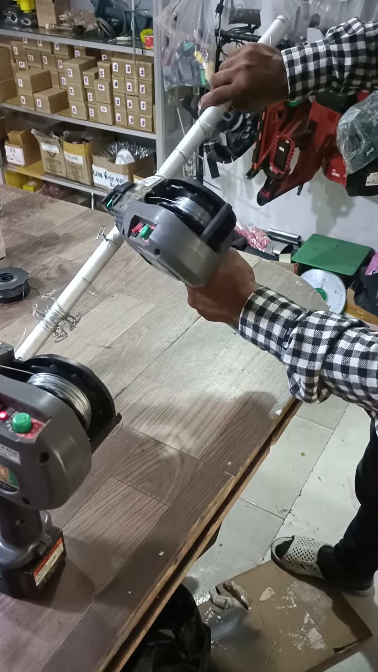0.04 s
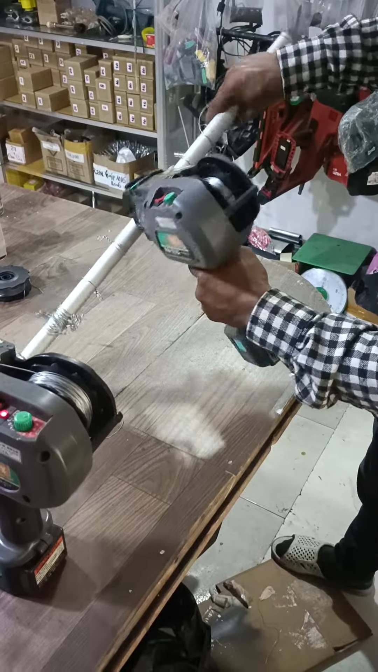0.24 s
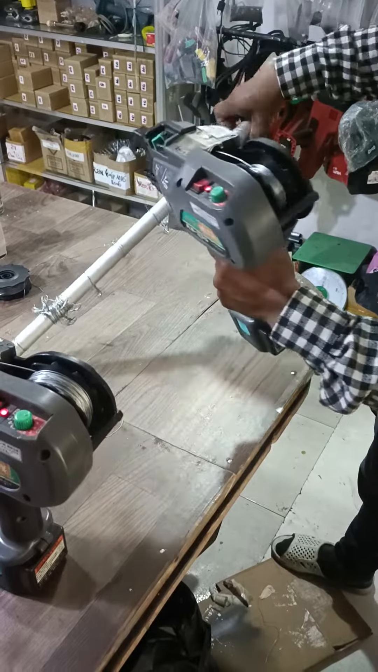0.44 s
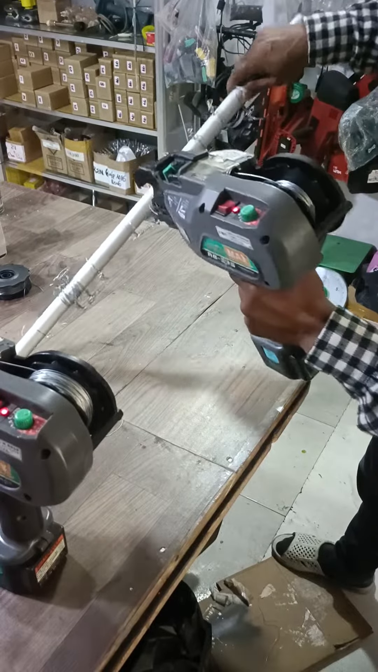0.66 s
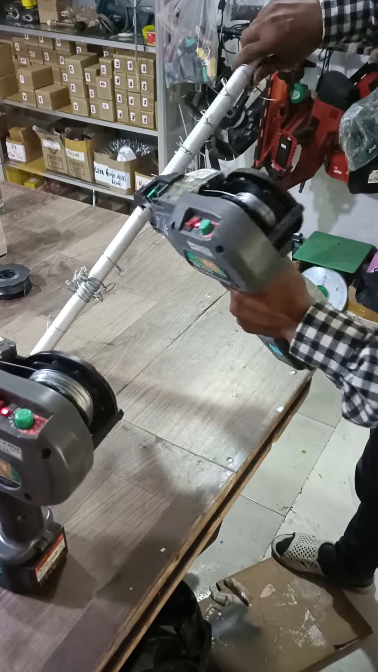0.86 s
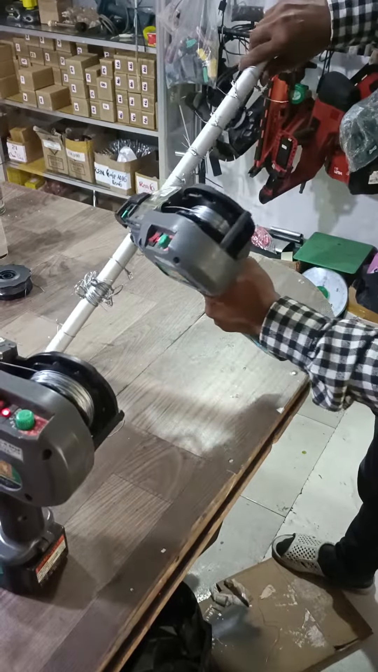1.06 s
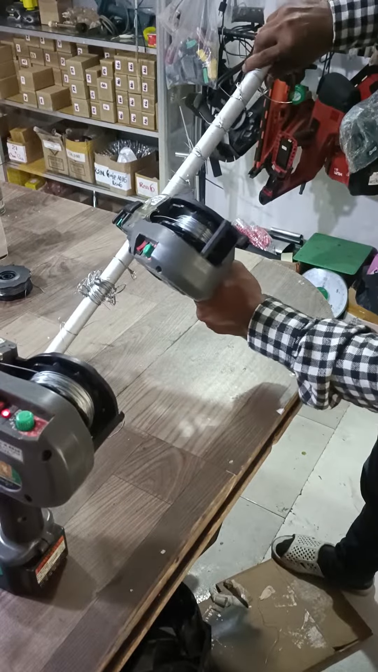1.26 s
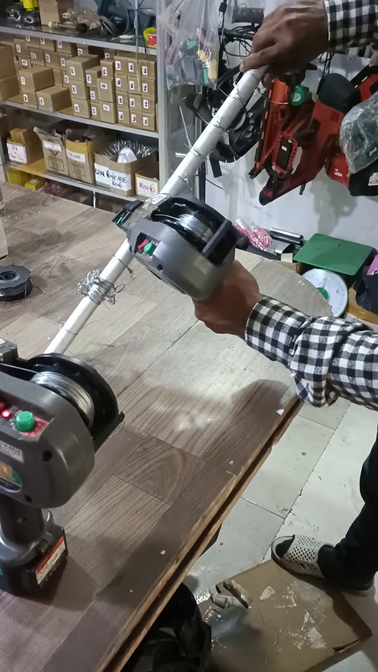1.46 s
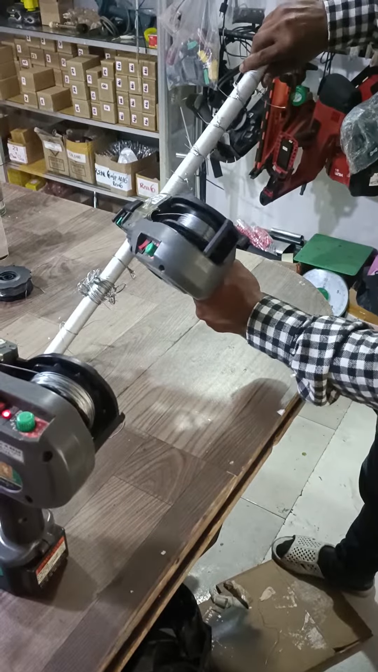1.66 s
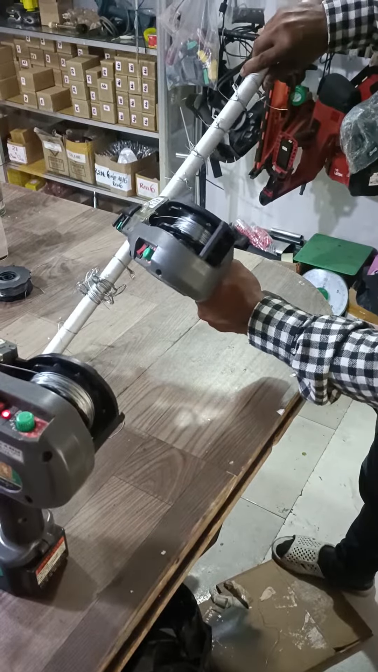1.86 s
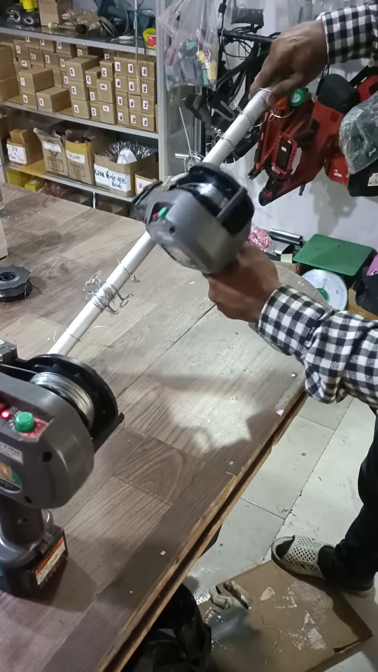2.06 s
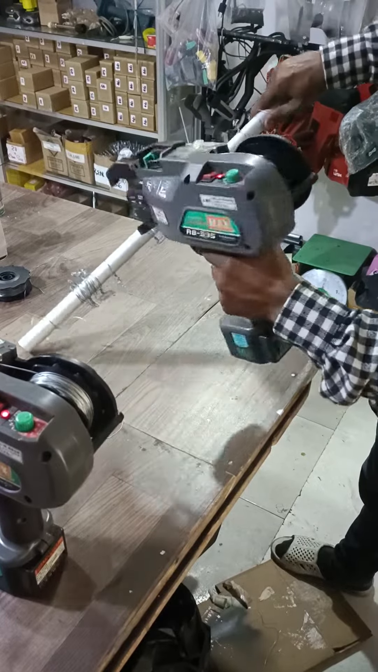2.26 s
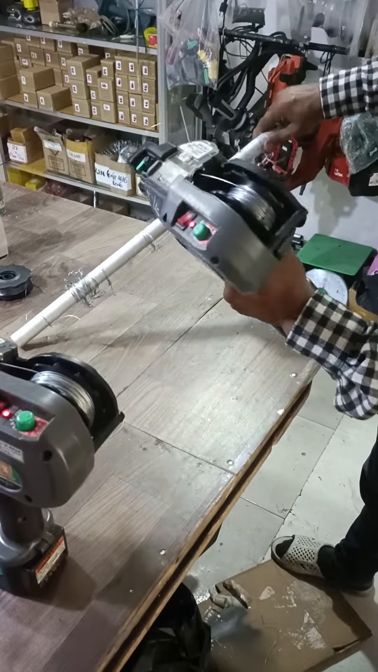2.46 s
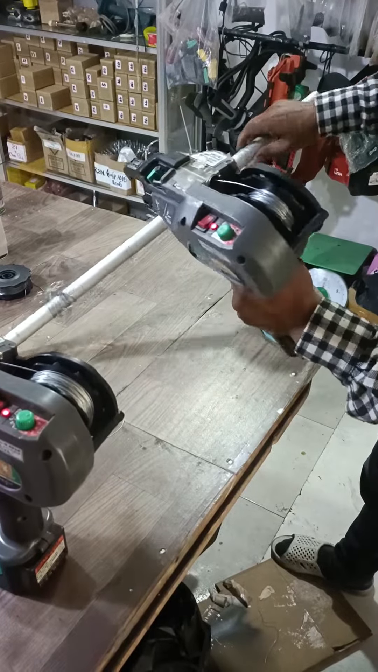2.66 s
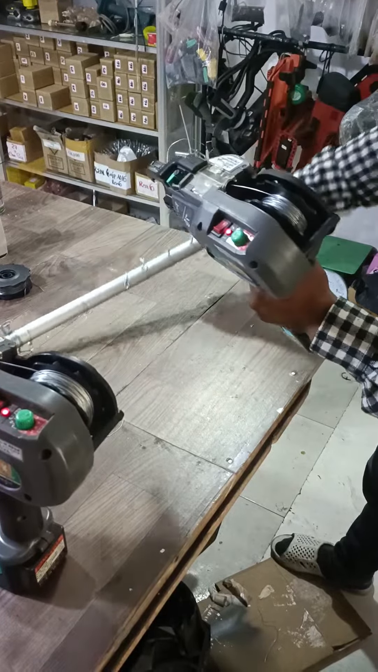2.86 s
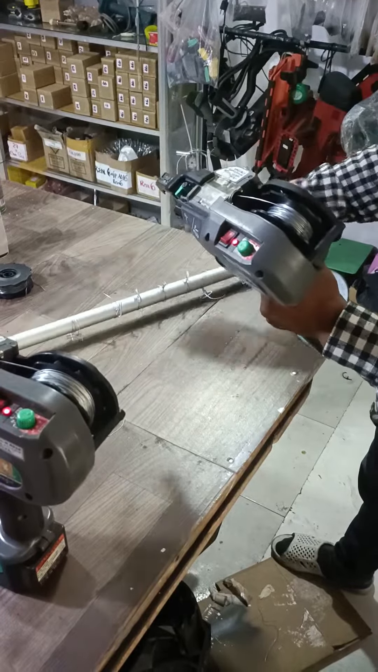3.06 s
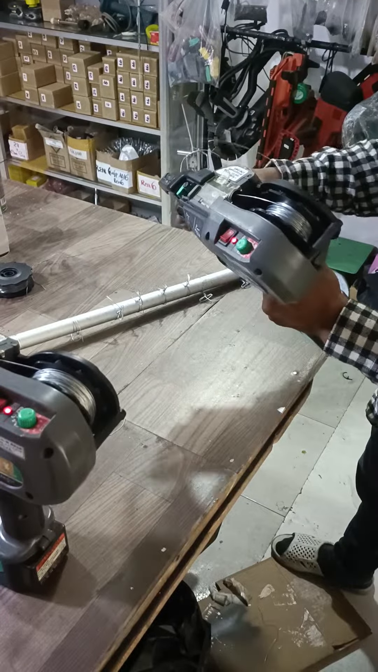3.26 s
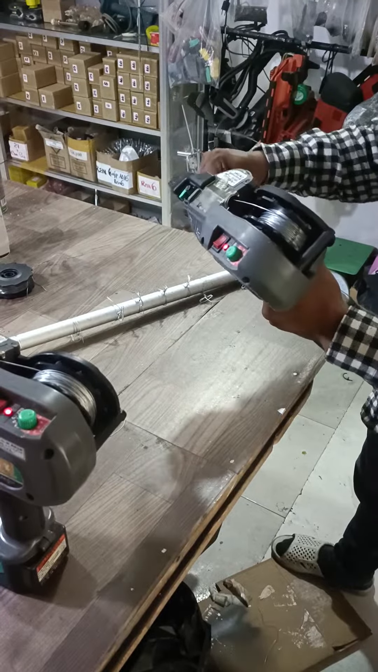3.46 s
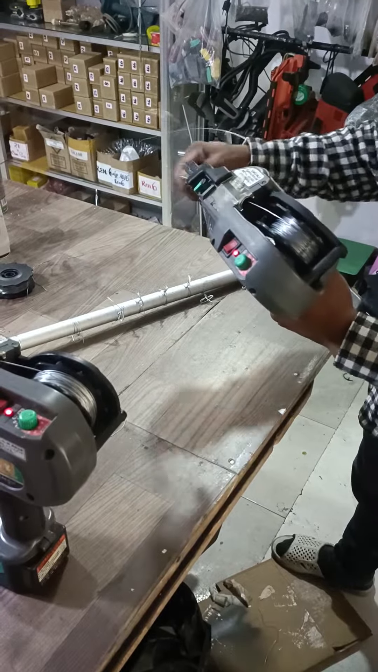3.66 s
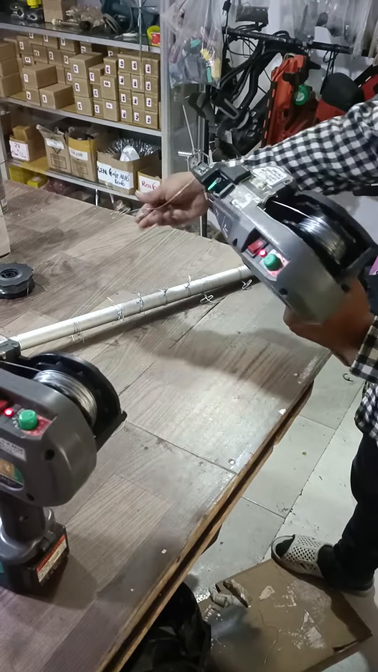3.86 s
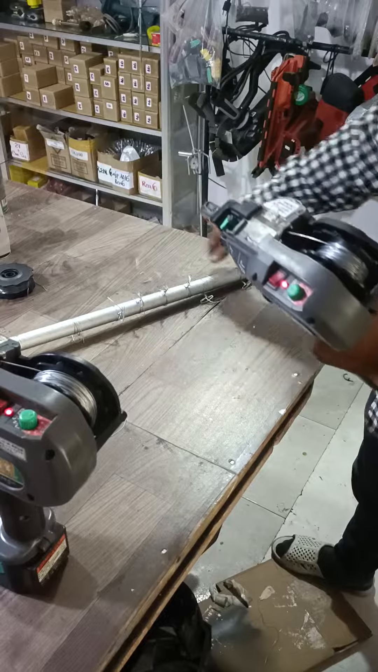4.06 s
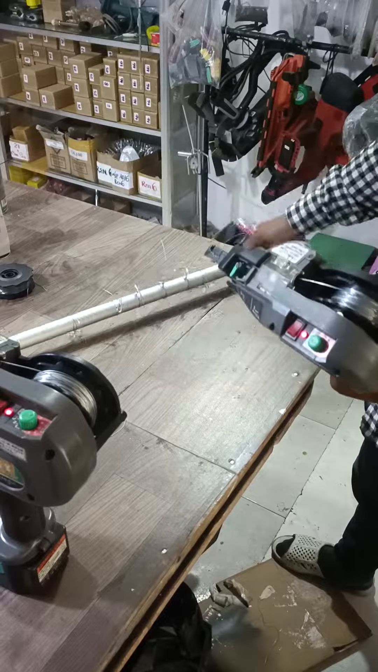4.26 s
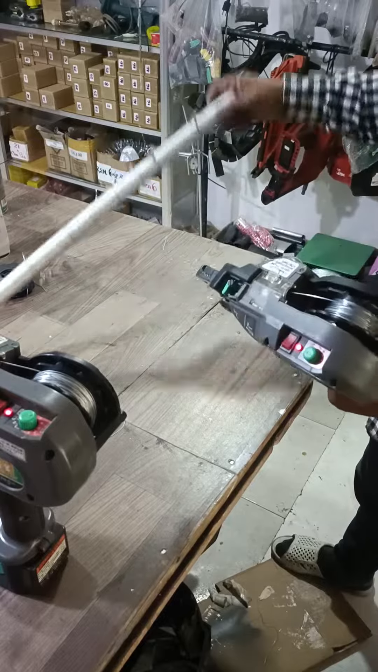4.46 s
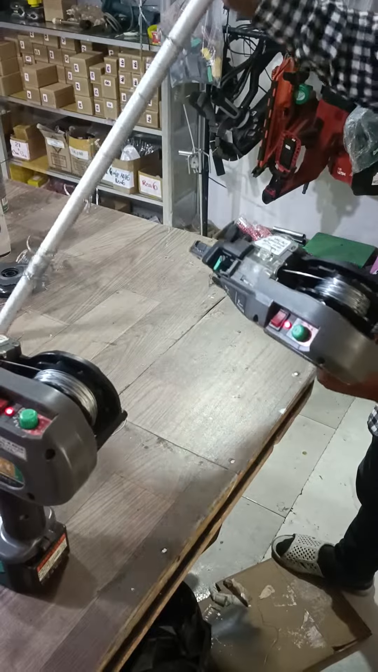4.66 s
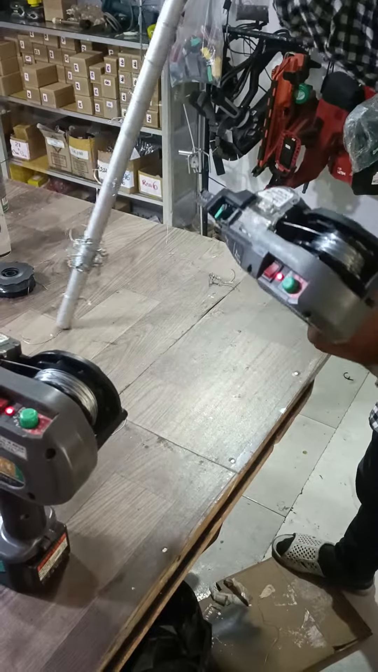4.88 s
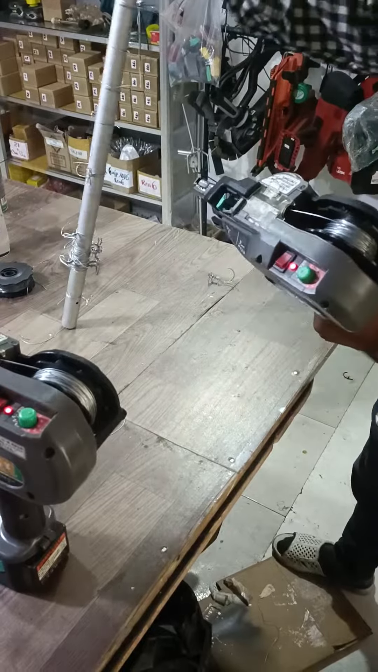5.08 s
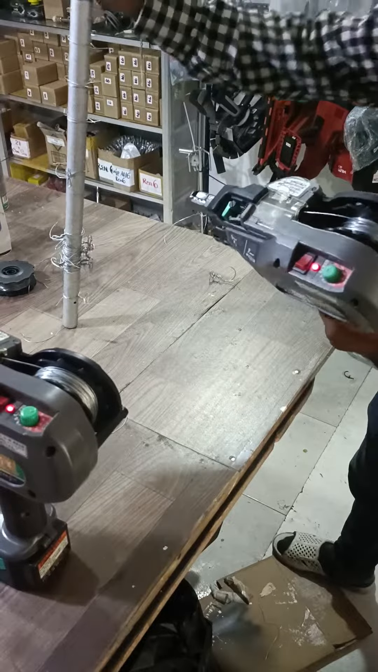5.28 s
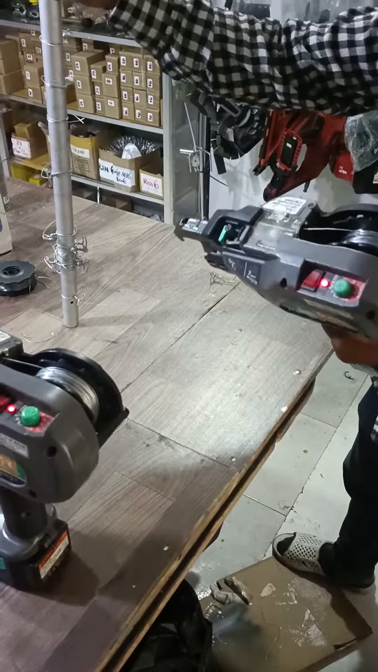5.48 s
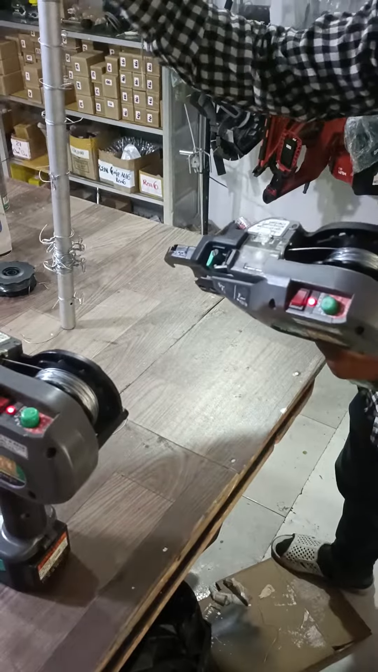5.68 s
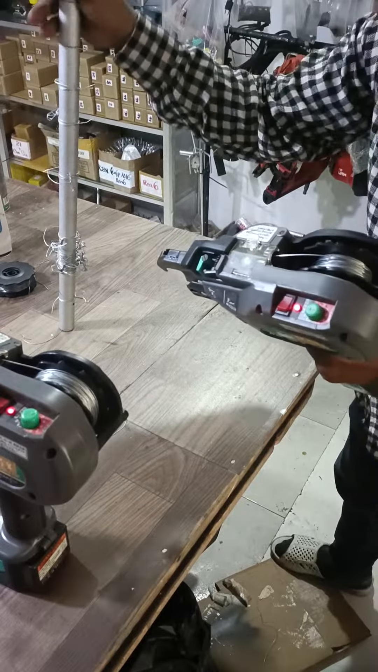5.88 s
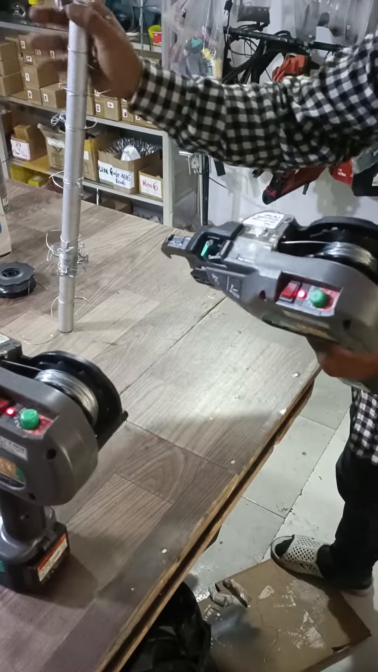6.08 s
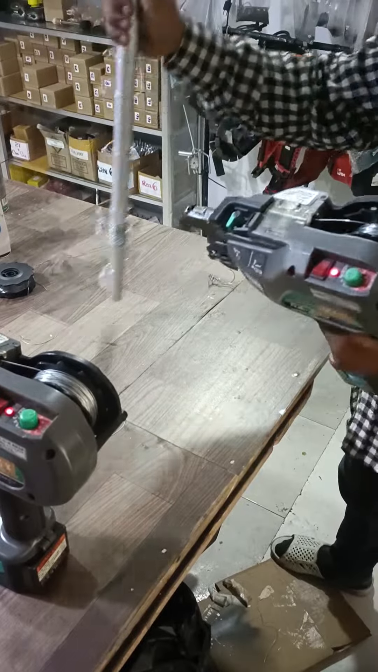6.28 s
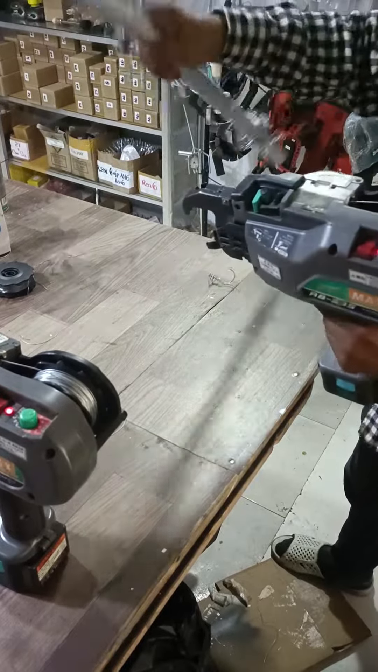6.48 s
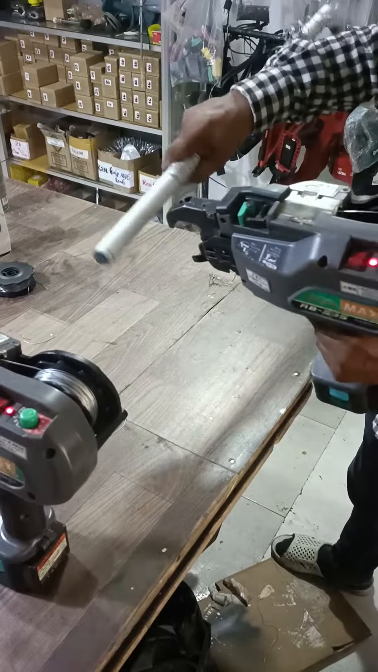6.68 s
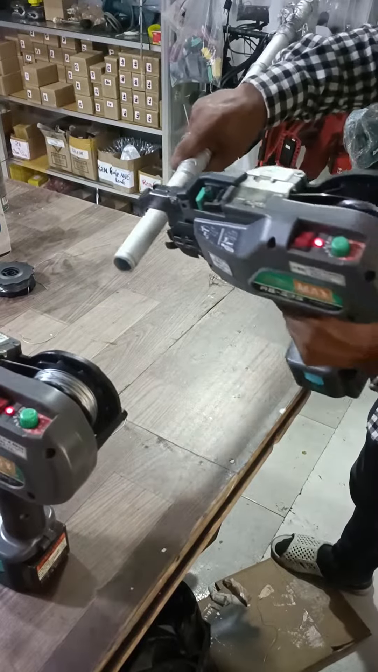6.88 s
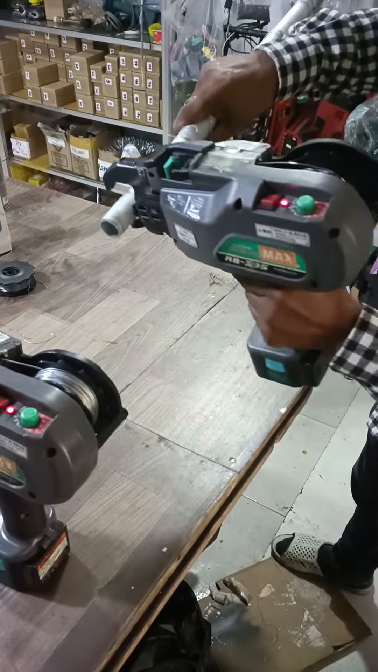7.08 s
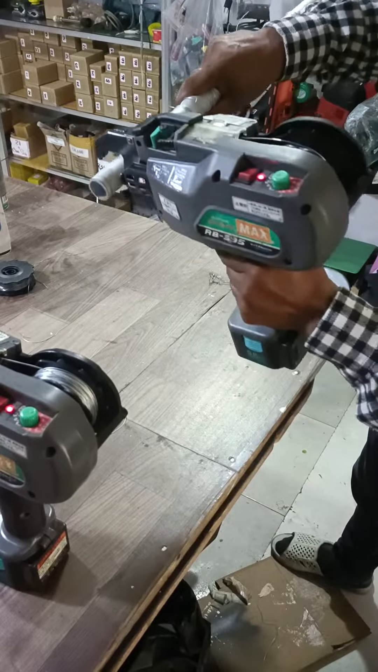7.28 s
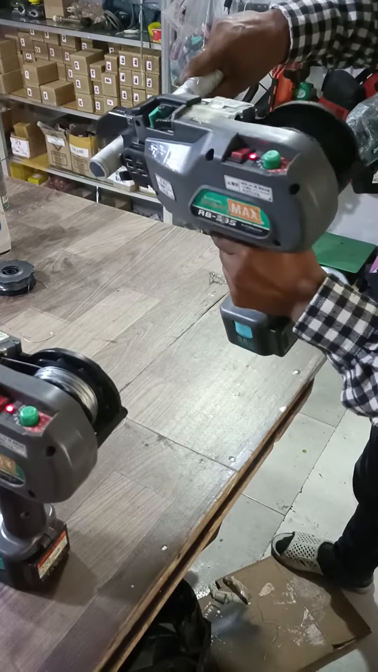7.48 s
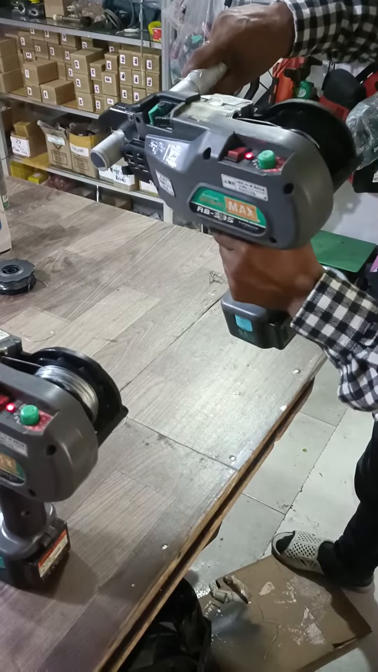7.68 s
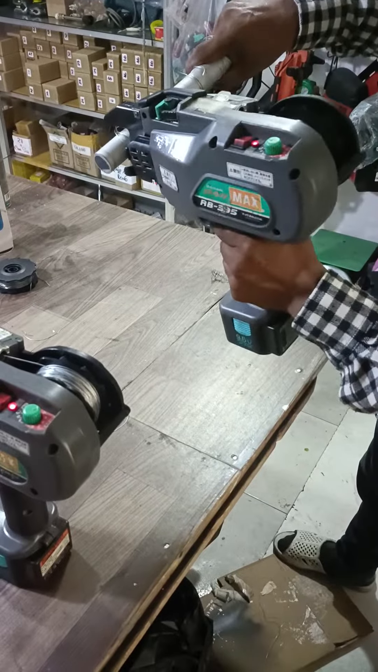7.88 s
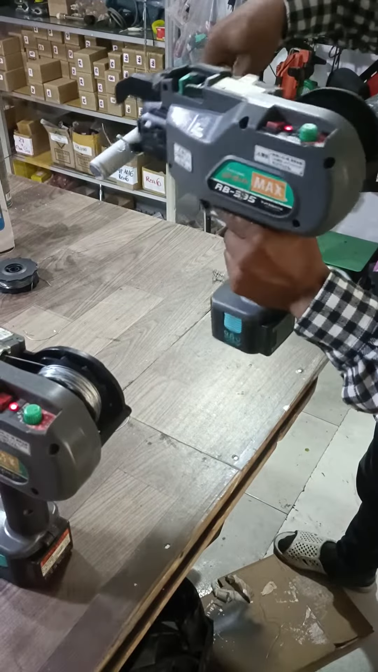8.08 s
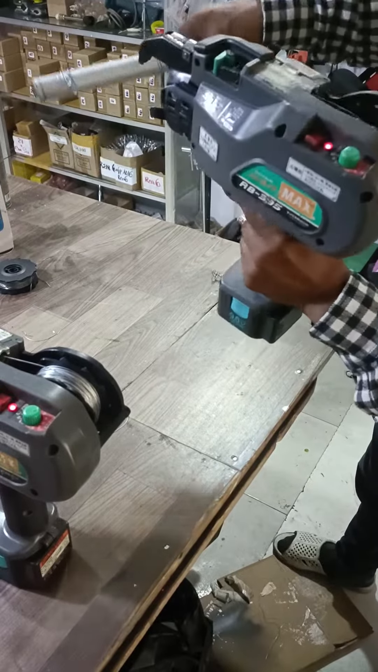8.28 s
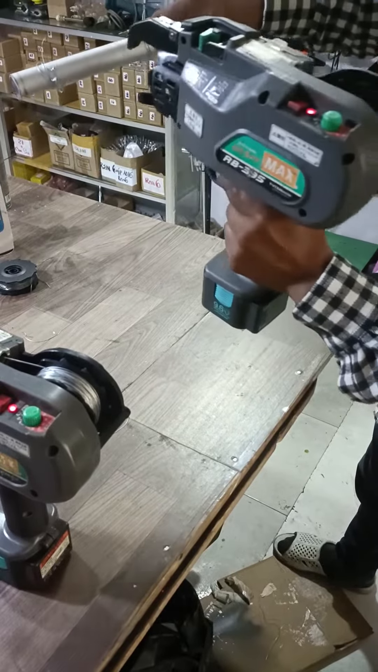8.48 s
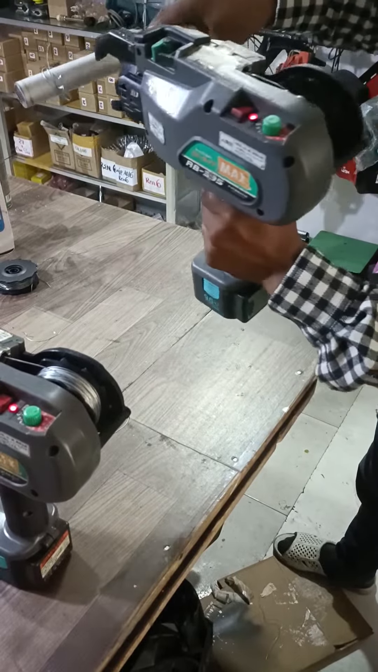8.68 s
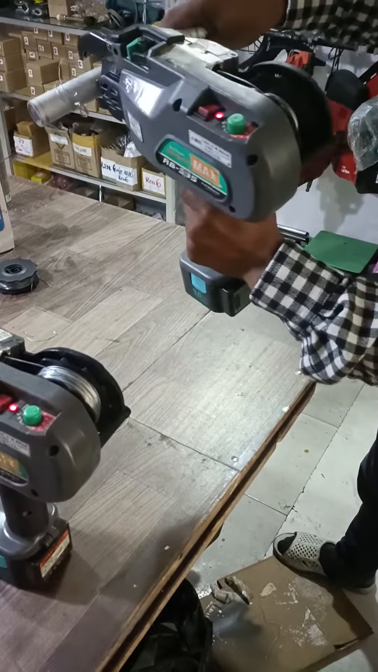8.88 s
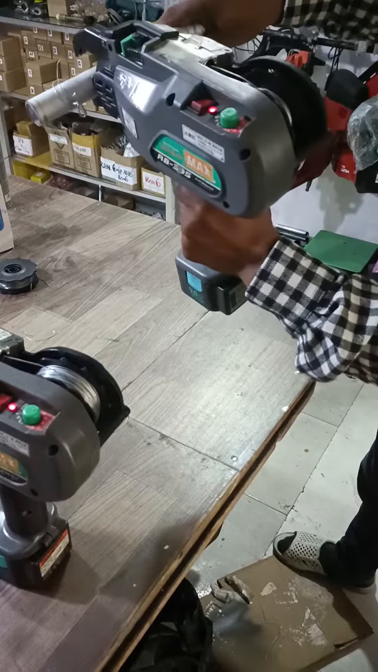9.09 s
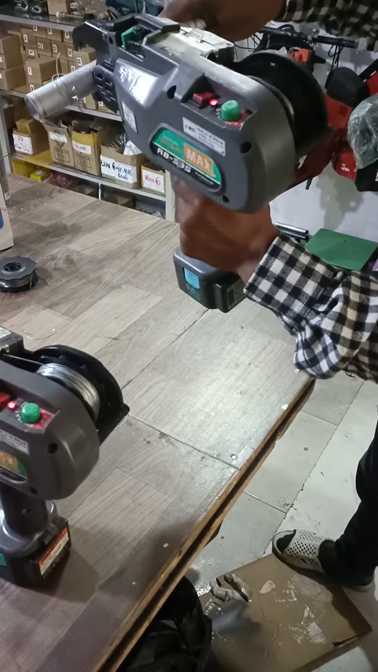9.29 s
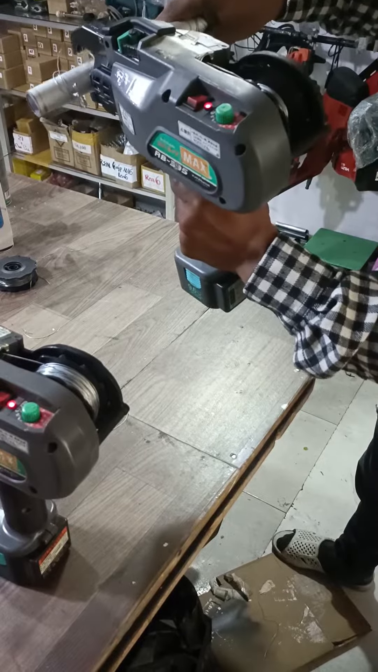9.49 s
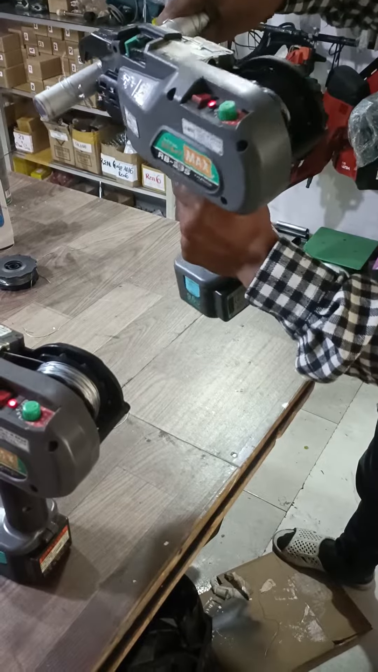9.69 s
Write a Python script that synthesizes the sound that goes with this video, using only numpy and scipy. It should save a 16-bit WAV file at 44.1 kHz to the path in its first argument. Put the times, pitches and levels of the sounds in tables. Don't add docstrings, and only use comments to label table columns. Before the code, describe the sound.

Close up in a small shop, a handheld battery tool ties wire round a hollow pipe. A burst already running ends in ratcheting and clunks, then a second follows. The pipe drops and bounces on a wooden table, scrapes, and loose wire rustles and ticks. After a near-quiet pause come two nose clicks, a third whirring tie, another pause, a firm clack and a last burst. A low fan hums far away; the phone is an arm's length off.

```python
import sys
import numpy as np
from scipy import signal
from scipy.fft import rfft, irfft, next_fast_len
from scipy.io import wavfile
from scipy.ndimage import uniform_filter1d

SR = 44100
rng = np.random.default_rng(int(sys.argv[2]) if len(sys.argv) > 2 else 0)


def store_wav(level_fs):
    pcm = np.round(np.clip(np.atleast_2d(level_fs), -1, 1) * 32767)
    wavfile.write(sys.argv[1], SR, pcm.T.astype(np.int16))


def field_ratio(decibels):
    return 10 ** (np.asarray(decibels, dtype=float) / 20)


N = 429534
TOOL_LEAD, TABLE_LEAD = 8, -5


def band(x, lo_hz, hi_hz, order=2):
    return signal.sosfilt(signal.butter(order, [lo_hz, hi_hz], "bandpass", fs=SR, output="sos"), x)


def unit(x):
    return x / np.sqrt(np.mean(x ** 2))


def colour(x, points):
    size = next_fast_len(N, True)
    f = np.maximum(np.fft.rfftfreq(size, 1 / SR), 1)
    hz, db = np.transpose(points)
    gain = field_ratio(np.interp(np.log(f), np.log(hz), db))
    return irfft(rfft(x, size) * gain, size)[:N]


def ring(x, modes):
    out = np.zeros(len(x))
    for hz, db, t60 in modes:
        pole = np.exp(2j * np.pi * hz / SR - np.log(1000) / (t60 * SR))
        out += field_ratio(db) * signal.lfilter([0, pole.imag], [1, -2 * pole.real, abs(pole) ** 2], x)
    return out


def walk(rate):
    k = int(SR / rate)
    return 1.2 * uniform_filter1d(np.repeat(rng.standard_normal(N // k + 1), k), k)[:N]


def grit(rate, spread_db):
    clicks = (rng.random(N) < rate / SR) * rng.standard_normal(N)
    return clicks * field_ratio(spread_db * rng.exponential(size=N))


def ports(x, pan_db, lead):
    left = np.roll(x, -(lead // 2)) * field_ratio(pan_db / 2)
    right = np.roll(x, lead - lead // 2) * field_ratio(-pan_db / 2)
    return np.array([left, right])


def curve(points):
    return np.interp(np.arange(N) / SR, *np.transpose(points))


def add_at(out, s, hit):
    start = int(s * SR)
    out[start:start + len(hit)] += hit


# (f/Hz, level/dB per Hz)
SHOP_COLOUR = [(12, -51.5), (20, -23), (68, -40.5), (83, -7.5), (123, -3), (285, -8.5), (319, -5),
               (434, -16), (759, -14.5), (1190, -21.5), (1760, -25.5), (2530, -29), (16000, -56)]
# (t/s, level/dB)
HUM_LEVEL = [(0, -63), (.54, -57), (1.52, -62.5), (2.38, -57), (5.5, -54.5), (9.74, -68.5)]
# (f/Hz, level/dB, t60/s)
FAN_TONES = [(98.7, -14.5, 0.92), (116.2, 4.5, 0.31)]


def shop():
    bass_db = curve(HUM_LEVEL)
    air_db = -51 + 0.13 * (bass_db - bass_db.mean())
    mid = colour(rng.standard_normal(N), SHOP_COLOUR)
    side = colour(rng.standard_normal(N), SHOP_COLOUR)
    side = 0.077 * side + band(side, 460, 17000, order=1)
    both = np.array([field_ratio(-19.5) * (mid + side), field_ratio(-20.0) * (mid - side)])
    bass = unit(band(both, 9.5, 230, order=3))
    air = unit(band(both, 250, 17000, order=3))
    fan = unit(ring(rng.standard_normal(N), FAN_TONES))
    return field_ratio(bass_db) * (bass + fan) + field_ratio(air_db - 3.0 + 1.7 * walk(4)) * air


def room(x):
    treble_t60_s, t60_s = 0.37, 0.4
    t, out = np.arange(SR // 2) / SR, 0
    place = np.cumsum(1 + .3 * walk(3)) * 2 * np.pi * 1.5 / SR
    for share in (np.sin(place), np.cos(place)):
        echoes = rng.standard_normal((2, len(t))) * np.clip((t - .002) / 0.0013, 0, 1)
        tail = band(echoes, 280, 6000, order=1) * field_ratio(-60 * t / t60_s)
        tail += band(echoes, 4000, 20000, order=1) * field_ratio(-60 * t / treble_t60_s)
        tail = tail / np.sqrt(np.sum(tail ** 2) / 2)
        out = out + signal.fftconvolve((share * x)[None], tail, axes=1)[:, :N]
    return out


def strokes(rows):
    t, out = np.arange(N) / SR, np.zeros((len(rows[0]) - 3, N))
    for s, rise, fall, *dbs in rows:
        near = slice(max(int((s - 2 * rise) * SR), 0), int((s + 2 * fall) * SR))
        away = np.maximum((s - t[near]) / rise, (t[near] - s) / fall)
        out[:, near] += field_ratio(np.array(dbs)[:, None] - 25 * away)
    return out


# (peak t/s, rise/s, fall/s, pipe scrape level/dB, wire rustle level/dB)
RUBS = [(1.09, .005, 0.079, -65, -45), (1.275, 0.038, .002, -43, -40), (2.86, 0.38, 0.134, -39.5, -72),
        (3.093, 0.035, 0.003, -33, -33), (3.42, .005, 0.046, -67, -51), (3.61, 0.19, .04, -65, -70),
        (3.67, 0.12, 0.0018, -35, -23.5), (3.435, 0.024, 0.022, -56, -41), (3.53, .004, 0.042, -61, -46),
        (4.116, 0.0063, 0.35, -64, -36.5), (4.63, 0.12, 0.18, -36, -43), (4.7, 0.14, 0.056, -38, -72),
        (4.76, 0.23, 0.037, -57, -66), (4.93, 0.0022, 0.087, -39, -42), (5.246, 0.0023, 0.16, -71, -40),
        (5.315, 0.092, 0.066, -55, -26.5), (5.712, 0.0036, 0.056, -60, -43.5),
        (5.88, .06, 0.11, -63, -46.5), (5.942, 0.0097, 0.056, -54, -30.5), (6.085, 0.0045, .08, -62, -47.5),
        (6.155, 0.016, 0.047, -57, -28.5)]
# (peak t/s, rise/s, fall/s, level/dB)
PIPE_SONGS = [(2.37, 0.0021, 0.2, -39), (2.95, 0.67, .2, -62.5), (3.6, 0.045, 0.19, -45),
              (5.4, 0.0054, 0.35, -53), (1.1, .01, .2, -57), (4.68, 0.15, 0.27, -46),
              (4.93, .01, 0.13, -44.5), (6.3, .003, 0.14, -45), (5.35, .08, 0.11, -73)]
# (peak t/s, rise/s, fall/s, level/dB)
DRAGS = [
    (2.85, .15, 0.32, -53),
    (4.27, 0.047, .1, -52),
    (4.47, 0.058, 0.026, -36.5),
    (4.76, 0.068, 0.066, -40.5),
    (4.97, 0.053, 0.06, -39.5),
]
# (f/Hz, level/dB, t60/s)
PIPE_MODES = [(800, 0, 0.025), (1200, -3, .04), (1580, 1, .025), (2155, -10, 0.032), (2430, 3, .025),
              (2850, -6, .04), (3600, -4.5, 0.061), (4700, -6.5, .05), (6800, -16, .04)]
# (f/Hz, level/dB, t60/s)
WIRE_MODES = [(7710, 7.5, 0.0036), (8850, -1, .01), (9260, -6.5, 0.0064), (10800, -13, 0.0032)]


def rubbing():
    (scraping, fingering), (singing,), (dragging,) = strokes(RUBS), strokes(PIPE_SONGS), strokes(DRAGS)
    slip = grit(6000, 1.5) * field_ratio(3.0 * walk(50))
    rustle = grit(8000, 1.5) * field_ratio(3.0 * walk(60))
    tones = sum(ring(slip * field_ratio(3.5 * walk(30)), [mode]) for mode in PIPE_MODES)
    pipe = .65 * unit(tones) + unit(band(slip * field_ratio(3 * walk(40)), 700, 3800))
    wood = 0.25 * unit(ring(slip, TABLE_MODES)) + unit(band(slip, 270, 1050))
    wire = 0.28 * unit(ring(rustle, WIRE_MODES)) + unit(band(rustle, 6000, 12800))
    wire += 0.51 * unit(band(rustle, 2700, 18000))
    wire += 0.23 * field_ratio(9.1 * walk(30)) * unit(band(rustle, 3800, 5900))
    sing = unit(ring(rng.standard_normal(N) * field_ratio(4.0 * walk(63)), [(8520, 0, .014)]))
    mix = field_ratio(-7.0) * scraping * pipe + field_ratio(-12.0) * fingering * wire
    mix += field_ratio(-7.0) * singing * sing + field_ratio(-1.5) * dragging * wood
    return ports(mix, 5.6, TABLE_LEAD)


# (t/s, peak level/dB, boom level/dB, crack level/dB, chatter/s)
KNOCKS = [
    (1.276, -23, -14, 11, 0.028),
    (2.274, -10.5, -21.5, -5, 0.035),
    (3.096, -3, -31, 2.5, 0.011),
    (3.105, -5, -37, -37, 0.05),
    (3.205, -8.5, -51, -3, 0.032),
    (4.25, -36, -13, -3, 0.045),
    (4.434, -20, -8.5, -3, 0.047),
    (4.92, -25.5, -19, 4, 0.056),
]
# (f/Hz, level/dB, t60/s)
TABLE_MODES = [(207, -13.5, .12), (280, -9, 0.12), (349.5, -10.5, .05), (454, -4.5, 0.071),
               (509.3, -0.5, 0.089), (578, -3, 0.1), (764, -7.5, 0.025), (1030, -10, 0.022),
               (1143, -7, .04), (1308, -10.5, .04), (1680, -12.5, 0.036), (2320, -12.5, .03),
               (2750, -13.5, .03)]
# (f/Hz, level/dB, t60/s)
BOOM_MODES = [(100, 0, .16), (135, -4, .12), (185, -6, .1)]


def table():
    out, t = np.zeros(N + 16384), np.arange(16384) / SR
    for s, db, boom_db, crack_db, chatter_s in KNOCKS:
        chatter = 0.034 * np.exp(-(t / chatter_s) ** 2)
        blow = rng.standard_normal(16384) * (np.exp(-t / 0.00065) + chatter)
        shifts = rng.standard_normal((len(TABLE_MODES), 2))
        spot = [(hz * (1 + .03 * a), g + 1.5 * b, t60) for (hz, g, t60), (a, b) in zip(TABLE_MODES, shifts)]
        thud = unit(band(ring(blow, spot), 170, 8000)) + 0.69 * unit(band(blow, 400, 1400))
        boom = band(ring(np.exp(-t / .003), BOOM_MODES), 75, 360, order=3)
        crack = band(blow, 1090, 3000) + 0.14 * band(blow, 5500, 15500)
        parts = zip((0, boom_db, crack_db), (thud, boom, crack))
        hit = sum(field_ratio(g) * p / np.abs(p).max() for g, p in parts)
        add_at(out, s, field_ratio(db) * hit)
    return ports(band(out[:N], 70, 16000), 1.5, TABLE_LEAD)


def taps(events, crack_s, top_hz):
    out, t, turns = np.zeros(N + 2048), np.arange(2048) / SR, np.fft.rfftfreq(2048)[:, None]
    for s, db, hz, low_db, high_db in events:
        late = np.exp(-2j * np.pi * turns * np.ceil(crack_s * SR * rng.uniform(.05, .55, 4)))
        crack = irfft(np.prod((.7 - late) / (1 - .7 * late), axis=1), 2048)
        crack += .012 * rng.standard_normal(2048) * np.exp(-t / (4 * crack_s))
        low, mid = band(crack, 700, 1400, order=3), band(crack, 1300, 5200)
        centre, high = band(crack, 0.85 * hz, 1.22 * hz, order=1), band(crack, 5400, top_hz)
        parts = zip((low_db, -4, -9, high_db - 5.5), (low, mid, centre, high))
        hit = sum(field_ratio(g) * p / np.abs(p).max() for g, p in parts)
        add_at(out, s, field_ratio(db - 1.5) * hit)
    return out[:N]


# (t/s, peak level/dB, centre f/Hz, highs level/dB)
TICKS = [(1.0486, -38.5, 5400, 3), (1.062, -51, 1510, 0), (1.239, -41, 4180, -15),
         (1.423, -34, 1900, -27.5), (2.9714, -34, 2570, -33), (3.4195, -35, 6840, -8),
         (3.4291, -44, 5110, -10), (3.6318, -30, 6200, -5), (3.664, -23, 8900, 1), (4.61, -26, 2410, -19),
         (8.9865, -19.5, 3500, -22), (3.5257, -37, 6330, -3), (3.6, -36, 6200, -10),
         (4.1135, -32, 6060, -8), (4.1886, -38, 5170, -21), (4.244, -45, 2310, -13), (4.2638, -37, 2550, 9),
         (4.411, -35, 6370, -15), (4.5971, -32, 2280, -23), (4.9383, -28, 1670, -24),
         (5.4244, -51, 5840, 1.5), (5.714, -49, 2540, -4), (6.0814, -48, 4760, 16), (6.1354, -44, 1820, 8),
         (6.153, -46, 5260, 14), (6.159, -33, 4800, 18.5), (5.2455, -39, 6030, 3.5),
         (6.2627, -41, 3620, -4.5), (7.3648, -37, 3250, -28.5)]
# (t/s, peak level/dB, centre f/Hz, lows level/dB, highs level/dB)
CLACKS = [
    (1.2766, -10.5, 4200, -24, -6),
    (3.5515, -25, 1530, -23, -9),
    (3.6756, -2, 3300, -27, -4),
    (4.1305, -17, 2650, -29, -4.5),
    (4.2784, -25, 5100, -20, -29),
    (4.9209, -19.5, 1670, -12, -1),
    (5.9416, -29.5, 5560, -17, -15),
    (8.9818, -8, 2860, -19, -10),
]


def touches():
    ticks = [(s, db, hz, -13, high_db) for s, db, hz, high_db in TICKS]
    return taps(CLACKS + ticks, crack_s=.0015, top_hz=15500)


# (t/s, level/dB, f/Hz, t60/s)
RINGS = [(1.091, -48, 4170, 0.087), (1.092, -57, 5860, 0.17), (3.612, -30.5, 4130, 0.088),
         (3.638, -23.5, 3326, 0.059), (3.622, -37.5, 1670, 0.055), (3.677, -30, 810, 0.096),
         (4.919, -33, 1632, 0.07), (5.246, -42.5, 3600, 0.13),
         (7.0235, -27, 3270, .16),
    (7.0235, -31, 1647, .11),
    (7.0235, -50, 8440, .2),
]


def rings():
    out, t = np.zeros(N + 16384), np.arange(16384) / SR
    for s, db, hz, t60 in RINGS:
        pair = np.sin(2 * np.pi * hz * t) + .7 * np.sin(2 * np.pi * 1.011 * hz * t + 6 * rng.random())
        add_at(out, s, field_ratio(db - 60 * t / t60) * pair)
    return out[:N]


# (t/s, peak level/dB, centre
# f/Hz, lows level/dB)
CLUNKS = [(0.0742, -17, 4030, -29.5), (0.3, -4.5, 4580, -15.5), (0.359, -13.5, 2380, -30.5),
          (0.4946, -4, 3500, -40.5), (0.5605, -18.5, 2330, -36), (1.5809, -24.5, 1245, -29),
          (1.6322, -8, 1430, -32.5), (1.9499, -7, 1534, -22.5), (2.1186, -23, 2250, -18),
          (2.144, -21, 2090, -26), (2.2903, 0, 1330, -27), (2.321, -6, 5080, -12),
          (7.4121, -3.5, 1404, -33.5), (7.6017, -9, 4410, -21), (7.63, -5.5, 1212, -17),
          (7.7377, -12, 4260, -4), (7.9028, -18, 3650, -6), (7.9477, -4, 4000, -18),
          (9.4575, -10.5, 1074, -26), (9.5784, -4.5, 3720, -14.5)]
# (t/s, peak level/dB, centre f/Hz, lows level/dB, highs level/dB)
NOSE_CLICKS = [
    (7.0242, -11.5, 1700, -33.5, -13),
    (7.1192, -6.5, 2830, -40, -11),
]


def clunks():
    stops = [(*row, -1.5) for row in CLUNKS]
    return taps(NOSE_CLICKS + stops, crack_s=.003, top_hz=17000)


FEED_KNOCKS = [1.631, 1.663, 1.690, 1.715, 1.741, 1.768, 1.791, 7.413, 7.441, 7.471, 7.497, 7.523, 7.547,
               7.572, 9.287, 9.316, 9.341, 9.365, 9.389, 9.410, 9.434]
# (first t/s, last t/s, teeth, slowing 0-1)
RATCHETS = [
    (.312, .483, 14, .15),
    (2.177, 2.276, 12, .09),
    (7.962, 8.143, 16, .06),
]


def teeth():
    times = [FEED_KNOCKS, np.add(FEED_KNOCKS, .0102)]
    for first, last, count, slowing in RATCHETS:
        part = np.linspace(0, 1, count)
        times.append(first + (last - first) * (part + slowing * (part ** 2 - part)))
    times = np.concatenate(times)
    blows, t = np.zeros(N), np.arange(1024) / SR
    blows[(times * SR).astype(int)] = field_ratio(1.5 * rng.standard_normal(len(times)))
    shape = np.exp(-t / 0.0015) * (1 - np.exp(-t / 0.00095))
    return np.maximum(signal.fftconvolve(blows, shape / shape.max())[:N], 0)


# (feed t/s, twist t/s, coast t/s, hook return t/s, stop t/s)
TIES = [
    (-.3, -.08, .23, .3, .575),
    (1.581, 1.81, 2.05, 2.14, 2.35),
    (7.391, 7.6, 7.9, 7.95, 8.2),
    (9.229, 9.455, 9.8, 9.85, 10.05),
]
# (wake/s, spin-up/s, return level/dB, lows level/dB, whine level/dB,
# slow return level/dB, lows lost on return level/dB)
MANNERS = [
    (.005, .02, -1.5, -1, -5, -5, 11.5),
    (.0012, 0.028, 3, 0, -12.5, 3, 4.5),
    (0.0035, 0.0087, -0.5, -1.1, 1, -0.8, -1.5),
    (0.0055, 0.01, .1, -0.5, 3.5, .3, .3),
]
# (first level/dB, last level/dB, low kick on engaging level/dB,
# dulled highs on engaging level/dB, engaging/s)
LOADS = [
    (-24.5, -22, 0, 8, 0.033),
    (-20, -22, 13, 3, 0.16),
    (-28.5, -27.5, 17, 5.5, 0.086),
    (-24.5, -31.5, 12, 1.5, 0.12),
]
# (first knocks/s, last knocks/s, first knock depth/dB, last knock depth/dB)
TURNS = [
    (23.72, 44, 12.5, 11),
    (154.9, 143, 14, 6.5),
    (143.5, 135, 8, 4.5),
    (97.96, 74, 6.5, 12),
]
# (first f/Hz, last f/Hz, first level/dB, last level/dB, bend of the glide)
MESH = [
    (3980, 4850, -26, -12.5, 0.74),
    (4300, 3720, -29.5, -0.5, 1.7),
    (3666, 3100, -9, -22.5, 1.1),
    (3700, 3700, -30, -31, 1.1),
]


def cycle():
    t, marks = np.arange(N) / SR, np.ravel(TIES)
    at = np.searchsorted(marks, t, side="right") - 1
    tie, stage = np.divmod(at, len(TIES[0]))
    running, since = stage < len(LOADS), t - marks[at]
    stage = np.minimum(stage, len(LOADS) - 1)
    done = np.where(running, since / np.diff(marks)[at], 1)
    back = stage == len(LOADS) - 1
    wake_s, spin_s, back_db, lows_db, sings_db, slow_db, thin_db = np.array(MANNERS)[tie].T
    first_db, last_db, kick_db, dull_db, engage_s = np.array(LOADS)[stage].T
    fast, slow, deep_db, shallow_db = np.array(TURNS)[stage].T
    from_hz, to_hz, quiet_db, loud_db, bend = np.array(MESH)[stage].T

    db = first_db + (last_db - first_db) * done + back_db * back
    db -= (stage == 0) * (3.5 * np.exp(-since / spin_s) + 26 * np.exp(-since / wake_s))
    db -= back * slow_db * np.exp(-(since / .03) ** 2)
    lows_db = lows_db - back * thin_db * (1 - np.exp(-since / .05))
    low_db = -26 + lows_db + kick_db * np.exp(-since / engage_s)
    high_db = 2.5 - dull_db * np.exp(-(since / engage_s) ** 3)

    rate = fast + (slow - fast) * done
    depth_db = deep_db + (shallow_db - deep_db) * done
    glide = done ** bend
    whine_hz = from_hz + (to_hz - from_hz) * glide
    whine_db = sings_db + quiet_db + (loud_db - quiet_db) * glide
    whine_db = whine_db - 9 * done ** 7
    twisting = (stage > 0) & ~back
    gate = uniform_filter1d(1. * running, size=100, origin=49, mode="nearest")
    return gate, (db, low_db, high_db), (rate, depth_db, whine_hz, whine_db, twisting)


# (f/Hz, level/dB per Hz)
GEAR_COLOUR = [(88, -54.5), (150, -42), (280, -25), (328, -47), (457, 8.5), (675, -12), (759, 3.5),
               (979, -13), (1420, 6.5), (2360, 9), (2650, 10.5), (4670, 2.5), (8230, -13.5), (11300, -16),
               (16000, -19.5)]
# (f/Hz, width/Hz, level/dB)
HOUSING = [(447, 3.8, -5.5), (1430, 120, 28.5), (2480, 210, -14.5), (3720, 420, 26), (5000, 300, 1),
           (10840, 750, -21), (11000, 350, -13)]
# (t/s, left minus right level/dB)
TOOL_PAN = [(0, 2.5), (.6, 0.5), (1.6, 1.5), (8.2, -1.5), (9.2, -2.5), (9.74, -0.5)]


def tool():
    gate, (db, low_db, high_db), (rate, depth_db, whine_hz, whine_db, twisting) = cycle()
    pan_db = curve(TOOL_PAN)
    turns = np.cumsum(rate * (1 + 0.023 * walk(60))) / SR
    size = field_ratio(2.2 * rng.standard_normal((N // 50, 2)))[turns.astype(int)].T
    knock = size[0] * np.exp(-(turns % 1) / rate / .0025)
    knock += .7 * size[1] * np.exp(-((turns - .4) % 1) / rate / .002)
    swell = 1 + (field_ratio(depth_db) - 1) * (twisting * knock + teeth())
    swell = swell * field_ratio(1.8 * walk(150))
    swell = swell / np.sqrt(uniform_filter1d(swell ** 2, size=2500))
    whine = np.sin(2 * np.pi * np.cumsum(whine_hz * (1 + 0.014 * walk(200))) / SR)
    whine = whine * field_ratio(whine_db + 4.0 * walk(50))
    out = ports(gate * field_ratio(db) * 3.1 * whine, pan_db, TOOL_LEAD)

    modes = [(hz, mode_db, 0.74 / width) for hz, width, mode_db in HOUSING]
    for lead, part_db, side_db in ((TOOL_LEAD, -2.5, .3), (TOOL_LEAD + 3, -6, 5), (TOOL_LEAD - 5, -7, -6)):
        rattle = swell * unit(rng.standard_normal(N) + .4 * unit(grit(4000, 1.5)))
        body = unit(colour(rattle, GEAR_COLOUR)) + 0.29 * unit(ring(rattle, modes))
        body = body - .6 * band(body, 2625, 3075, order=1)
        low = unit(band(body, 240, 1040, order=3))
        mid = unit(band(body, 1100, 7900, order=4))
        high = unit(band(body, 8900, 22000, order=3))
        sound = gate * field_ratio(db + part_db) * (mid + field_ratio(low_db) * low + field_ratio(high_db) * high)
        out += ports(sound, pan_db + side_db, lead)
    return out


def scene():
    held = tool() + ports(clunks(), .3, TOOL_LEAD)
    laid = rubbing() + table() + ports(touches() + rings(), 2.0, TABLE_LEAD)
    echoes = room(held[0] + field_ratio(-0.2) * laid[0])
    return field_ratio(3.0) * (held + laid) + field_ratio(-2.5) * echoes + shop()


def low_pass(x):
    return signal.sosfilt(signal.butter(12, 17100, fs=SR, output="sos"), x)


def record(dry):
    x = 1.2 * np.tanh(dry / 1.2)
    x = signal.sosfilt(signal.butter(2, 45, "highpass", fs=SR, output="sos"), x)
    x = signal.sosfilt(signal.ellip(10, .2, 60, 15800, fs=SR, output="sos"), x)
    return low_pass(np.clip(x, -1, 1))


dry = scene()
out = record(dry)
store_wav(out)
```